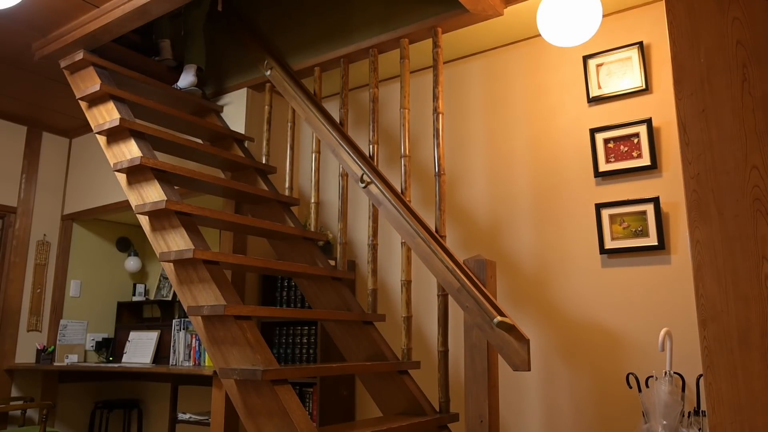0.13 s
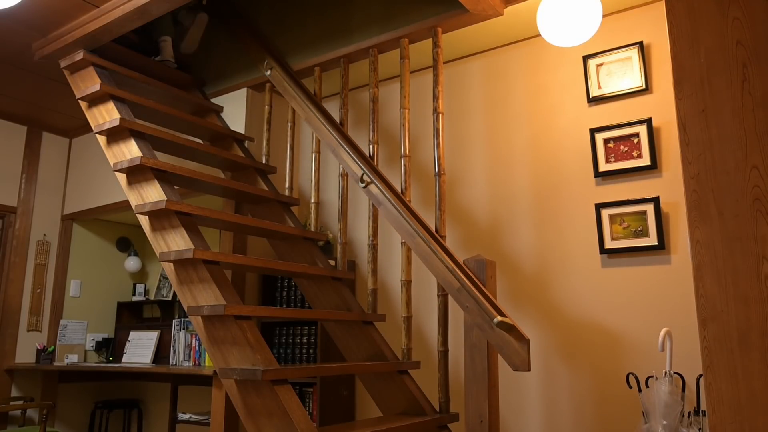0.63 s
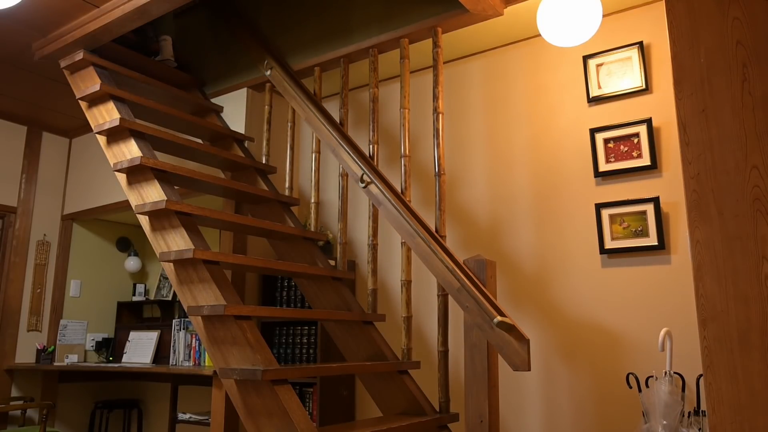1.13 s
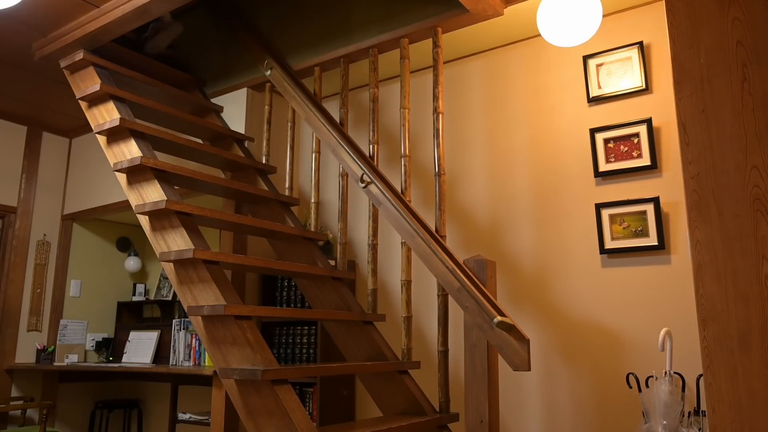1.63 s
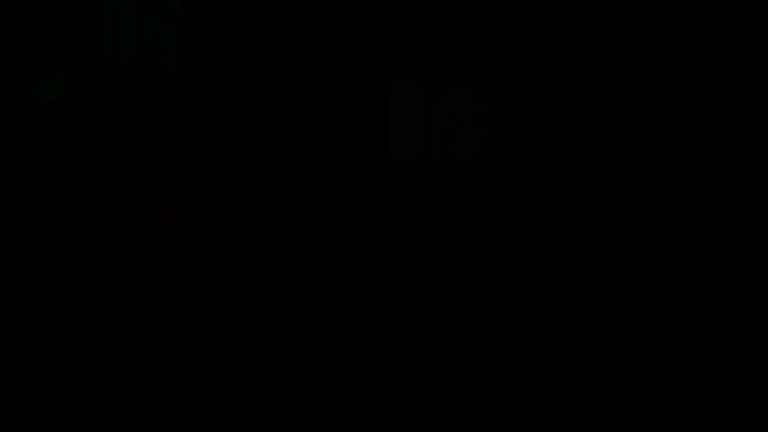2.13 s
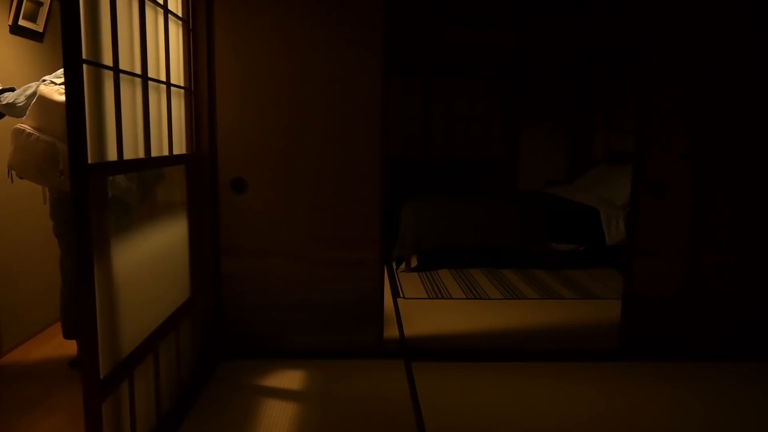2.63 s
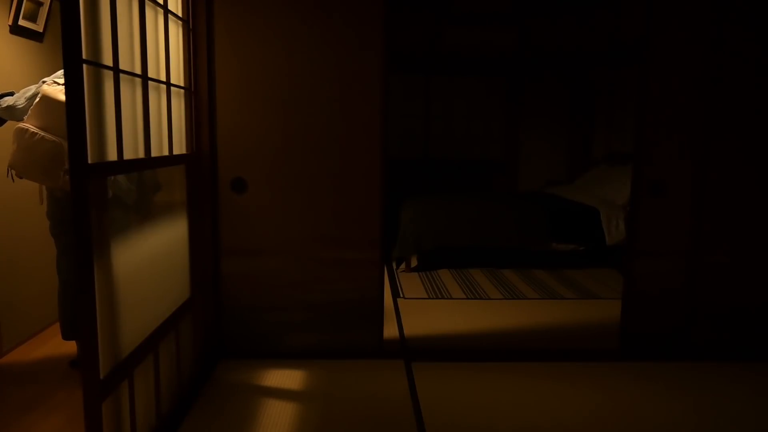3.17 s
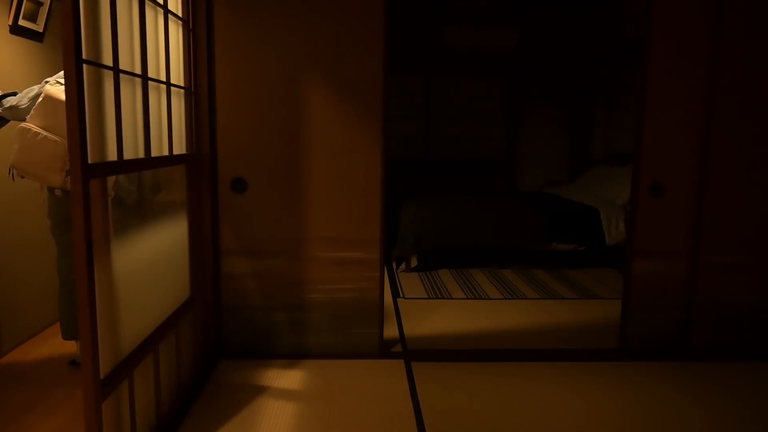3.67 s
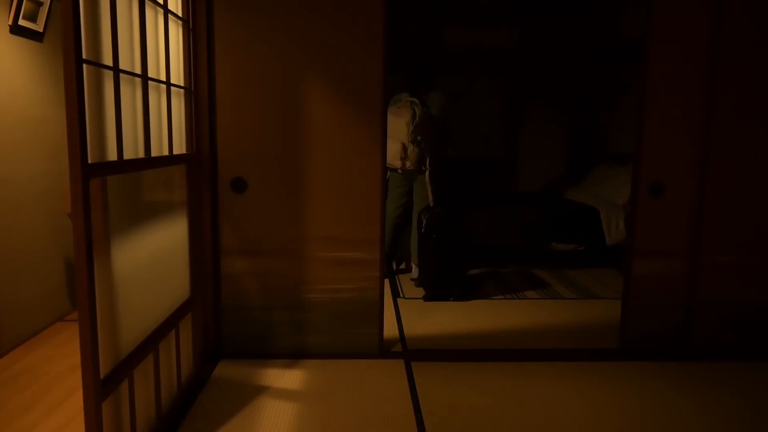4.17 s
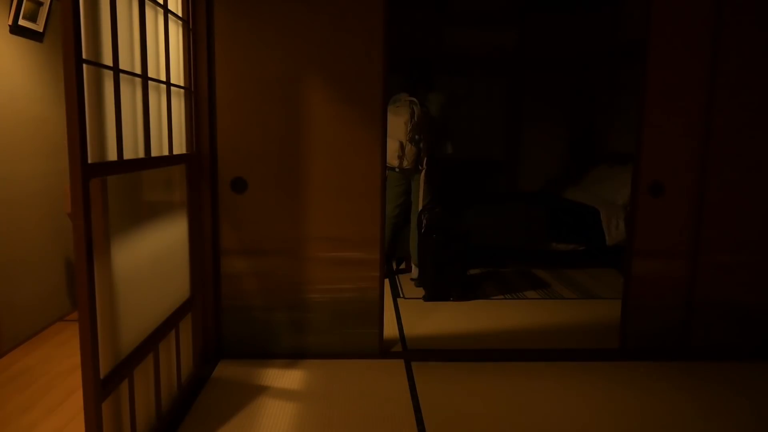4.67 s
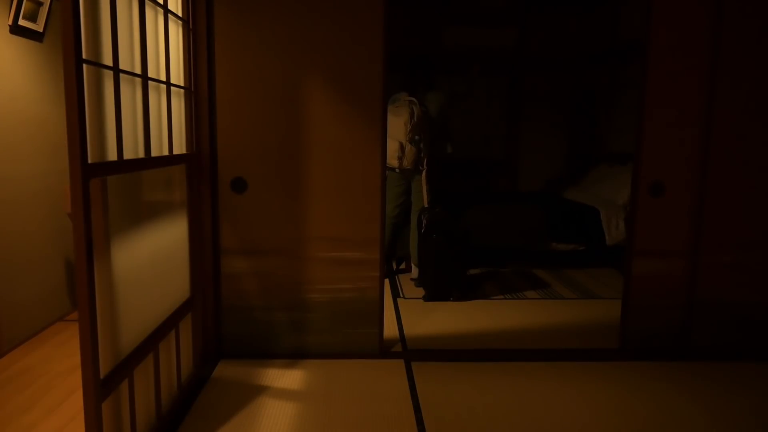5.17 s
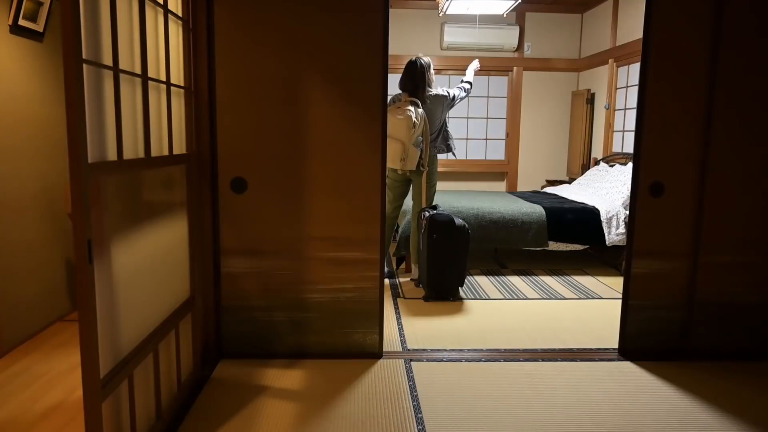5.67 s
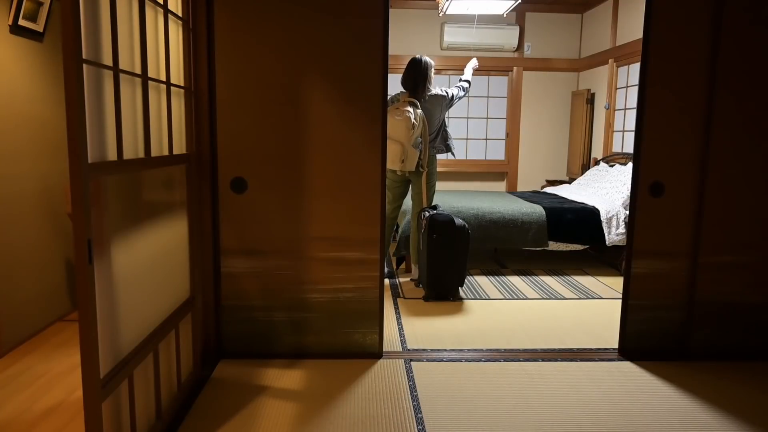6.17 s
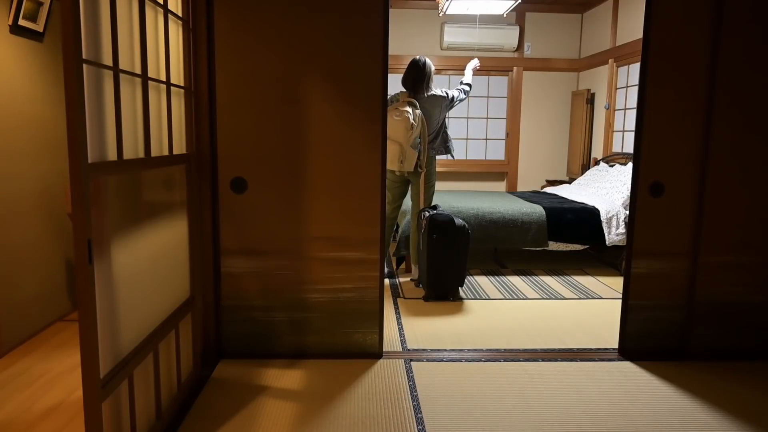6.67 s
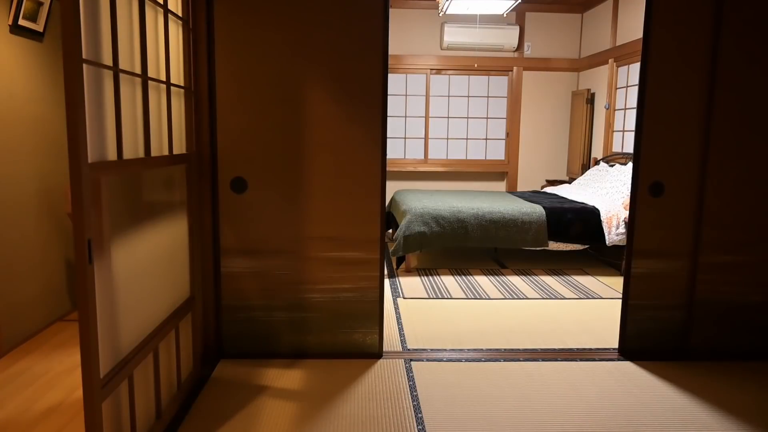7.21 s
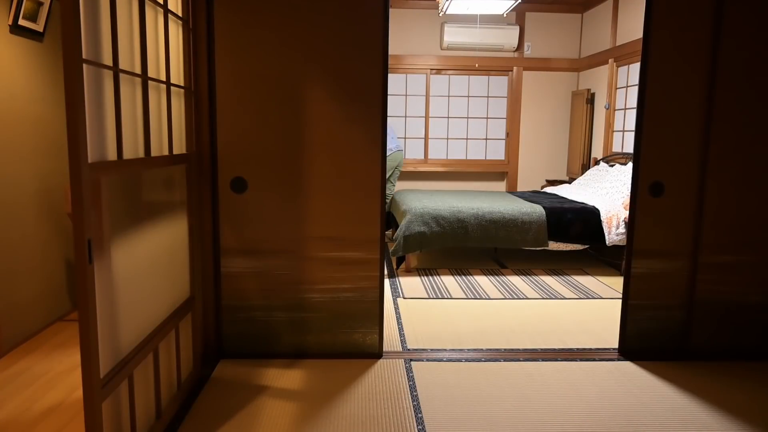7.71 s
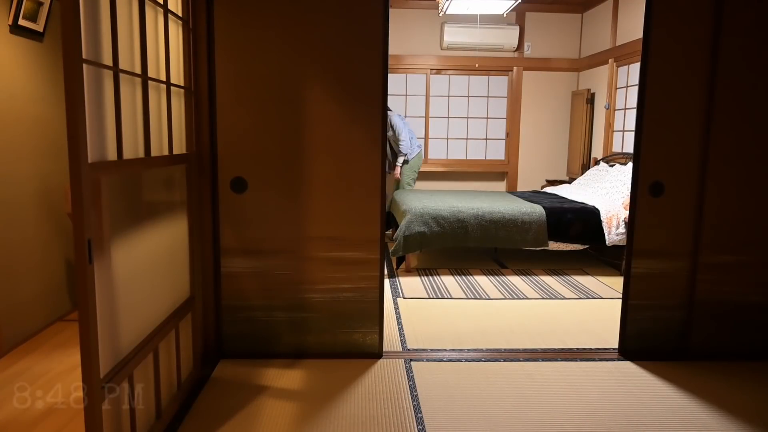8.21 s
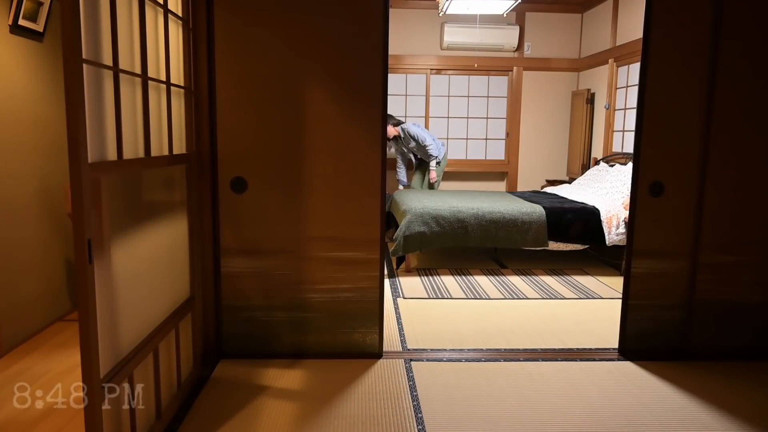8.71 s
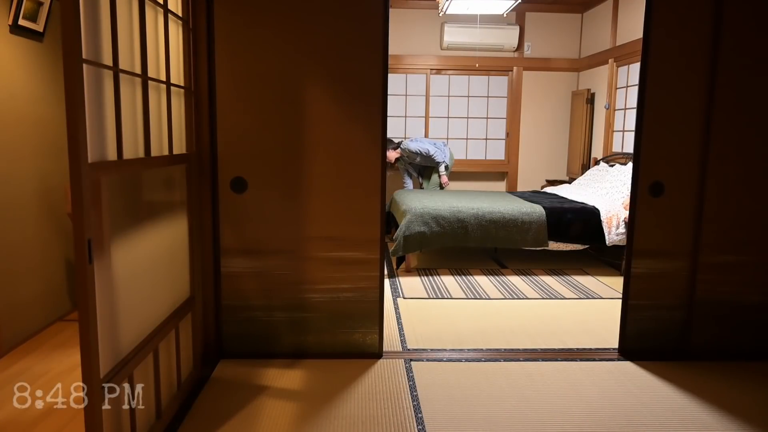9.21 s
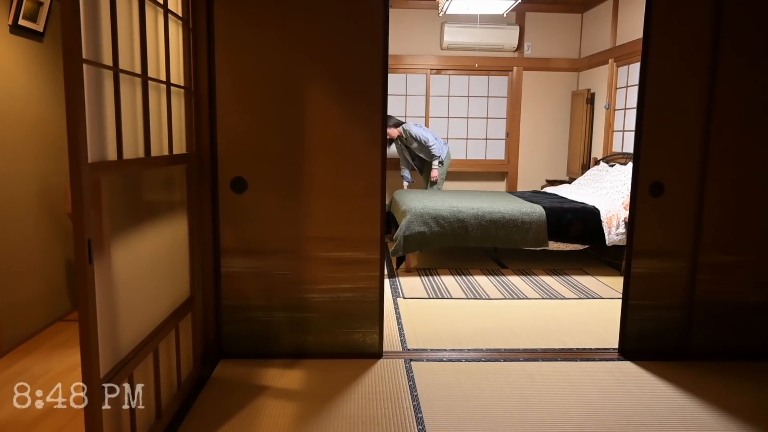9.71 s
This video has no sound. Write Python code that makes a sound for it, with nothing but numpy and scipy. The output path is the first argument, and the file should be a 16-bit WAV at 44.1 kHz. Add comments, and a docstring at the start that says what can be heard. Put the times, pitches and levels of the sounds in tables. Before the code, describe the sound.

In a quiet wooden house, soft footfalls and cloth rustle give way to sparse clicks, a lull, then knocks and a loud closing thud.

```python
"""A quiet wooden house at night: socked steps on open stairs and mats, a wall switch, a pull cord, a suitcase rolled,
knocked and set down. Each contact is a filtered impulse, answered by a resonance and drawn out by echoes of decaying
noise; thuds are ringing board modes and jolted fittings are narrow resonances. Shaped noise makes cloth rustle and
board rumble that follow the movement, over a faint steady room noise and a low sine hum that swells twice."""
import sys
import numpy as np
from scipy import signal
from scipy.io import wavfile

SR = 44100
rng = np.random.default_rng(int(sys.argv[2]) if len(sys.argv) > 2 else 0)


def gain_from_db(level_db):
    """Convert decibel levels to linear amplitude factors (20 dB per decade)."""
    decades = np.asarray(level_db, float) / 20
    return 10 ** decades


def store_pcm(level_fs):
    """Save levels as 16-bit WAV."""
    pcm = np.round(np.clip(level_fs, -1, 1) * 32767).astype(np.int16)
    wavfile.write(sys.argv[1], SR, np.atleast_2d(pcm).T)


N = 434385     # length of the scene in samples

# Switches and latches. Each row: start in seconds, contact level in dB at the pivot pitch,
# tilt in dB per octave, pitch of the struck body in Hz, level of the body in dB.
CLICKS = [(1.2782, -29.5, 3, 2300, -25.5), (2.0014, -48, -2.5, 735, -46), (2.4212, -35, 3.5, 720, -33),
          (2.6099, -51, -1.5, 3870, -49), (3.3036, -38, 3, 567, -31), (3.5741, -52, 1.2, 573, -51),
          (4.1545, -48, -1.5, 3620, -48), (4.5389, -47.5, -1, 680, -61), (6.133, -60.5, 0, 1630, -56.5),
          (7.418, -51, -1, 3700, -46.5), (7.9876, -59, 3, 3800, -60)]
HIGH_BODY_HZ = 2000     # bodies of CLICKS pitched above this answer with the sharp contacts


def rms_one(x):
    """Scales a sound to an rms of 1."""
    return x / np.sqrt(np.mean(x ** 2) + 1e-20)


def unit(x):
    """Scales a sound to an energy of 1."""
    return x / np.sqrt(np.sum(x ** 2))


def at_hz(points, hz):
    """Reads a curve of (Hz, value) at a pitch, straight over log frequency."""
    curve_hz, values = np.transpose(points)
    return np.interp(np.log(hz), np.log(curve_hz), values)


def drift(corner_hz):
    """Slow chance: noise through a double one-pole low-pass, spread 1, computed at every 40th sample."""
    r = np.exp(-2 * np.pi * corner_hz * 40 / SR)
    white = rng.standard_normal(N // 40 + 2002)
    slow = signal.lfilter([1], [1, -2 * r, r * r], white)[2000:]     # skips the filter's start
    return np.interp(np.arange(N) / 40, np.arange(len(slow)), rms_one(slow))


def band(x, low_hz, high_hz, order=2):
    """Band-pass between two pitches."""
    edges_hz = [low_hz, min(high_hz, .45 * SR)]
    return signal.sosfilt(signal.butter(order, edges_hz, "band", fs=SR, output="sos"), x)


def noise_bands(size, wider_db):
    """Half-octave bands of stereo noise, nearly mono in the low mids and wide in the treble: (centre Hz, noise)."""
    # Stereo width before wider_db. Each row: pitch in Hz, side minus mid in dB.
    stereo_width = [(30, 6), (60, -17), (125, -34), (250, -21.5), (500, -18), (1000, -11), (2000, -4),
                    (4000, 0)]
    # Balance between the ears. Each row: pitch in Hz, left minus right in dB.
    left_lean = [(250, 0.1), (2000, -1.5), (6000, -0.1), (13000, -1)]
    edges_hz = 25 * 2 ** np.arange(0, 9.6, .5)
    white = rng.standard_normal((2, 2, size + 4000))
    for k, (low, high) in enumerate(zip(edges_hz, edges_hz[1:])):
        # neighbouring bands take turns at two independent noises
        mid, side = band(white[k % 2], low, high)[:, 4000:]
        hz = np.sqrt(low * high)
        balance = gain_from_db(at_hz(left_lean, hz) * np.array([[.5], [-.5]]))
        side_level = gain_from_db(min(0, at_hz(stereo_width, hz) + wider_db))
        yield hz, balance * (mid + side_level * side * [[1], [-1]])


def ring(x, hz, t60):
    """One mode excited by x, dying by 60 dB in t60 seconds."""
    r, w = gain_from_db(-60 / (t60 * SR)), 2 * np.pi * hz / SR
    return signal.lfilter([0, np.sin(w)], [1, -2 * r * np.cos(w), r * r], x)


def resonance(hz, q):
    """An impulse through a steep band of width hz / q, unit energy."""
    impulse = signal.unit_impulse(SR // 10)
    return unit(band(impulse, hz * (1 - .5 / q), hz * (1 + .5 / q)))


def room(direct_db, build_up_s, early):
    """One random draw of the room echo: direct sound, then a tail, raised at first by early, dying band by band."""
    # How long the wooden rooms ring. Each row: pitch in Hz, time to fall by 60 dB in seconds.
    decay_times = [(100, 1), (400, 0.4), (1200, 0.49), (3000, 0.45), (7000, 0.44), (13000, 0.087)]
    early_s = .007     # the first reflections fade into the tail at this pace
    t = np.arange(SR // 2) / SR
    tail = 0
    for hz, noise in noise_bands(size=len(t), wider_db=0):
        tail = tail + noise * gain_from_db(-60 * t / at_hz(decay_times, hz))
    tail = tail * (1 - np.exp(-t / build_up_s)) * (1 + early * np.exp(-t / early_s))
    tail = tail / np.sqrt(np.sum(tail ** 2) / 2)
    tail[:, 0] = gain_from_db(direct_db)
    return tail


def in_rooms(events, direct_db, build_up_s, early):
    """Events (s, sound) are dealt in turn to three random draws of the same room echo, so that neighbours differ."""
    spread_s = 0.035     # the room spreads the energy of a blow over about this long
    turns = np.zeros((3, N + SR))
    for k, (s, sound) in enumerate(events):
        at = round(s * SR)
        turns[k % 3, at:at + len(sound)] += np.sqrt(spread_s * SR) * sound
    out = 0
    for blows in turns:
        echoes = room(direct_db, build_up_s, early)
        out = out + signal.fftconvolve(blows[None, :N], echoes)[:, :N]
    return out


def contacts(rows):
    """Each contact is one impulse, tilted dull or bright by what touches what: events (s, sound)."""
    # Parts of the impulse that the tilt weighs. Each row: lower edge in Hz, upper edge in Hz.
    contact_bands = [(250, 500), (500, 1000), (1000, 2500), (2500, 6000), (6000, 15500)]
    pivot_hz = 1600     # the tilt turns about this pitch
    arch_db = 0.81      # both ends fall away: dB per squared octave from the pivot
    impulse = signal.unit_impulse(SR // 10)
    parts = np.array([unit(band(impulse, low, high, order=3)) for low, high in contact_bands])
    parts[1::2] *= -1     # neighbours add up without a notch
    octaves = np.log2(np.sqrt(np.prod(contact_bands, axis=1)) / pivot_hz)
    events = []
    for s, db, tilt_db, *_ in rows:
        levels_db = db + tilt_db * octaves - arch_db * octaves ** 2
        events.append((s, gain_from_db(levels_db) @ parts))
    return events


def bodies(rows):
    """The struck body answers a moment later with one broad resonance: events (s, sound)."""
    lag_s, body_q = .0015, 1.67     # q is pitch over width
    return [(s + lag_s, gain_from_db(db) * resonance(hz, body_q)) for s, *_, hz, db in rows]


def sharp_clicks():
    """Contacts of switches and latches, and their high-pitched bodies, arrive with a clear direct sound."""
    high = [row for row in CLICKS if row[3] > HIGH_BODY_HZ]
    events = contacts(CLICKS) + bodies(high)
    return in_rooms(events, direct_db=-14, build_up_s=.0007, early=.9)


def blunt_knocks():
    """Knocks, all their bodies and the low-pitched bodies of the clicks build up more slowly in the echoes."""
    # Cord, case and feet. Each row: start in seconds, contact level in dB at the pivot pitch,
    # tilt in dB per octave, pitch of the struck body in Hz, level of the body in dB.
    knock_rows = [(.4888, -49, 3, 343, -52), (.8377, -47, -1, 1350, -46), (1.051, -46.5, 2, 2190, -46),
                  (1.585, -63, -4, 750, -46.5), (1.6416, -61, -6.5, 594, -49.5),
                  (3.1378, -79, -5, 710, -53.5), (4.4043, -66, 1, 11000, -57), (4.555, -49, 3, 800, -45),
                  (4.5717, -37, 3.5, 875, -38.5), (5.0003, -40, 4, 1050, -40),
                  (5.205, -58.5, 2.5, 3880, -58), (7.051, -32.5, -1, 960, -33),
                  (7.1158, -59, 4.5, 790, -39), (8.0767, -62, 4.5, 715, -58), (8.5134, -56, 0.8, 3040, -56),
                  (8.8, -53, -3.5, 1490, -37), (9.1, -53.5, -3.5, 1540, -48.5),
                  (9.492, -42.5, -1.5, 1680, -39.5), (9.5585, -29, 1.6, 7500, -26.5),
                  (9.6035, -36, 0, 3770, -29.5), (9.6554, -50, -6, 3500, -44),
                  (9.7368, -58.5, -7.8, 2500, -41)]
    low = [row for row in CLICKS if row[3] <= HIGH_BODY_HZ]
    events = contacts(knock_rows) + bodies(knock_rows) + bodies(low)
    return in_rooms(events, direct_db=-20, build_up_s=0.0076, early=0)


def thuds():
    """Weight landing on boards: a soft push excites a board mode and a weaker, looser neighbour."""
    # Each row: start in seconds, peak level in dB, pitch of the board in Hz, time to fall by 60 dB in seconds.
    landings = [(0.126, -36, 203, 0.4), (.552, -35, 381, 0.28), (0.586, -39, 96, 0.21),
                (1.041, -35.5, 276, 0.089), (1.071, -31.5, 94, 0.22), (1.13, -34.5, 192, 0.18),
                (1.663, -39, 102, .1), (3.312, -39.5, 208, .15), (4.44, -50.5, 75.4, .2),
                (4.58, -40.5, 300, .15), (7.058, -29, 161, .2), (7.121, -34, 147, 0.072),
                (7.421, -49, 321, 0.22), (8.454, -43, 329, 0.15), (8.797, -39, 70, 0.14),
                (9.109, -38, 109, 0.07), (9.48, -12.5, 191, 0.11), (9.494, -16, 187, 0.047),
                (9.512, -22.5, 198, 0.035), (9.564, -16.5, 174, 0.087), (9.588, -17, 162, 0.13),
                (9.679, -23, 96, 0.032), (9.744, -28, 152, 0.14)]
    t = np.arange(SR // 2) / SR
    out = np.zeros(N + SR)
    for s, db, hz, t60 in landings:
        chance = rng.standard_normal(len(t))
        push = t * np.exp(-t / 0.00043) + 0.023 * chance * t * np.exp(-t / 0.015)
        mode = band(ring(push, hz, t60), 50, 470)
        loose = band(chance * t * np.exp(-t / 0.014), 79, 320, order=3)
        board = rms_one(mode) + gain_from_db(-2.0) * rms_one(loose)
        at = round(s * SR)
        out[at:at + len(t)] += gain_from_db(db) * board / np.abs(board).max()
    return out[:N]


def fitting_rings():
    """Small hard fittings of like shape are jolted: each sounds its short modes, drawn out by the room."""
    # Each row: start in seconds, pitch in Hz, level in dB, level of the overtones in dB above it.
    jolts = [(1.279, 1090, -29, -17), (2.18, 1730, -57, -5), (2.299, 1810, -68, -19),
             (3.574, 1840, -47, 0.5), (4.572, 2300, -34.5, -3), (5.001, 2420, -40, -3),
             (5.205, 2250, -57, -3), (7.062, 3900, -31, -24), (7.42, 2170, -50.5, 2),
             (7.987, 2330, -58.5, 8), (8.08, 2250, -56.5, 6.5), (8.233, 2290, -56.5, 3),
             (9.561, 1144, -30, -8), (9.56, 2460, -27.5, 7.5), (9.605, 2660, -31.5, 1.5),
             (9.657, 2660, -32, -22), (9.736, 3170, -35, -31), (9.745, 3650, -36, -31)]
    # Each row: multiple of the pitch, pitch over width, level in dB added to that of the overtones.
    overtones = [(1.76, 4.4, -1), (3.4, 7.2, -12)]
    events = []
    for s, hz, db, over_db in jolts:
        sound = resonance(hz, q=12.7)
        for multiple, q, mode_db in overtones:
            sound = sound + gain_from_db(over_db + mode_db) * resonance(hz * multiple, q)
        events.append((s, gain_from_db(db) * sound))
    return in_rooms(events, direct_db=-13, build_up_s=.001, early=.7)


def movement():
    """Cloth rustle and board rumble: bands of noise that follow the vigour of the movement, flickering."""
    # Vigour of the movement. Each row: time in seconds, level of the cloth rustle in dB.
    vigour = [(0, -51.5), (.25, -41.5), (.36, -45.5), (.6, -41), (.9, -45), (1.2, -50.5), (1.5, -47.5),
              (1.95, -46), (2.15, -49), (2.25, -55.5), (2.96, -58), (3.25, -61.5), (6.82, -61),
              (6.85, -49.5), (7.03, -47.5), (7.62, -54.5), (7.8, -42.5), (7.9, -50.5), (8.2, -51),
              (8.35, -48.5), (8.7, -52.5), (9.05, -51.5), (9.45, -49.5), (9.6, -57), (9.75, -46),
              (9.85, -55)]
    # Colour of the cloth before its tilt. Each row: pitch in Hz, relative level in dB per Hz.
    rustle_colour = [(280, -12), (500, 0), (800, 3.5), (2400, -2.5), (5200, -10), (16000, -30)]
    # Colour of the boards. Each row: pitch in Hz, relative level in dB per Hz.
    rumble_colour = [(25, -15), (60, -6.5), (190, -3.5), (300, -8.5), (500, -13.5)]
    cloth_tilt_db = 2.18                    # per octave
    usual_db, usual_boards_db = -52, -57     # cloth at an ordinary vigour, and the boards then
    boards_follow = .45                     # share of the cloth's swing in dB that the boards follow
    stairs_until_s, stairs_db = 1.7, 2.5    # the open stairs rumble more than the floors

    t = np.arange(N) / SR
    times, levels_db = np.transpose(vigour)
    cloth_db = np.interp(t, times, levels_db)
    boards_db = usual_boards_db + boards_follow * (cloth_db - usual_db) + stairs_db * (t < stairs_until_s)
    flicker_db = 1.0 * drift(17.5)
    cloth, boards = 0, 0
    for hz, noise in noise_bands(size=N, wider_db=4.5):
        if hz > 280:
            colour_db = at_hz(rustle_colour, hz) + cloth_tilt_db * np.log2(hz / 2000)
            cloth = cloth + gain_from_db(colour_db + flicker_db) * noise
        if hz < 560:
            # each band of the boards flickers by itself
            boards = boards + gain_from_db(at_hz(rumble_colour, hz) + 3.5 * drift(9)) * noise
    return gain_from_db(cloth_db) * rms_one(cloth) + gain_from_db(boards_db) * rms_one(boards)


def hum():
    """A low sine tone that swells twice while creeping up in pitch."""
    # Each row: middle in seconds, length in seconds, rms level at the middle in dB.
    swells = [(5.85, 0.85, -50), (6.5, 0.61, -50)]
    t = np.arange(N) / SR
    hz = np.interp(t, [swells[0][0] - .5, swells[-1][0] + .5], [72.2, 76.5])
    level = 0
    for middle, length, db in swells:
        arch = np.cos(np.pi * np.clip((t - middle) / length, -.5, .5)) ** 1.3
        level = level + gain_from_db(db) * arch
    return np.sqrt(2) * level * np.sin(2 * np.pi * np.cumsum(hz) / SR)


def room_noise():
    """Steady noise of the quiet house, coloured band by band."""
    # Each row: pitch in Hz, relative level in dB per Hz.
    noise_colour = [(15, -29), (25, 0), (48, -11.5), (97, -5.5), (190, -3.5), (344, -26), (560, -30),
                    (624, -29), (695, -6.5), (1330, -27.5), (9840, -24.5), (14800, -35), (16000, -27)]
    steady = 0
    for hz, noise in noise_bands(size=N, wider_db=4.5):
        steady = steady + gain_from_db(at_hz(noise_colour, hz)) * noise
    return gain_from_db(-58.5) * rms_one(steady)


def scene():
    """Contacts, landings and rings over the rustle of movement, the hum and the room noise."""
    blows = sharp_clicks() + blunt_knocks() + thuds() + fitting_rings()
    return blows + movement() + hum() + room_noise()


def low_pass(x):
    """Removes everything above the highest recorded frequency."""
    return signal.sosfilt(signal.butter(12, 16610, fs=SR, output="sos"), x)


def record(dry):
    """The converter adds a small constant offset."""
    mix = dry + 0.0011
    return low_pass(mix)


dry = scene()
out = record(dry)
store_pcm(out)
```